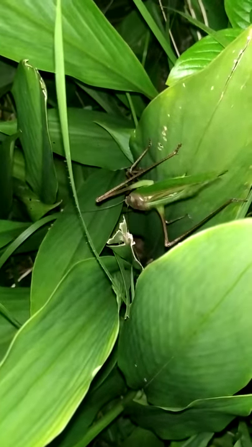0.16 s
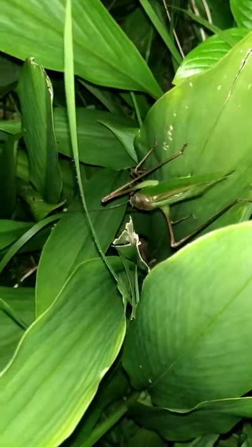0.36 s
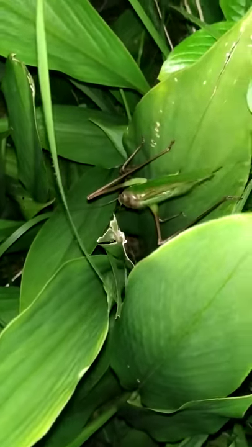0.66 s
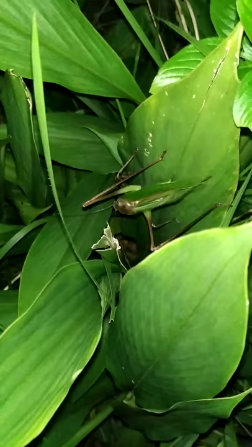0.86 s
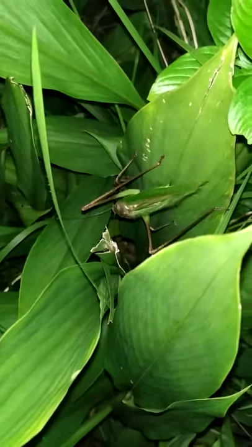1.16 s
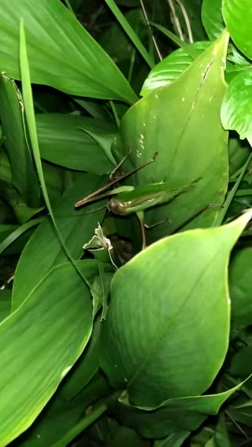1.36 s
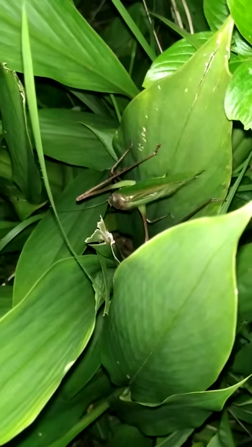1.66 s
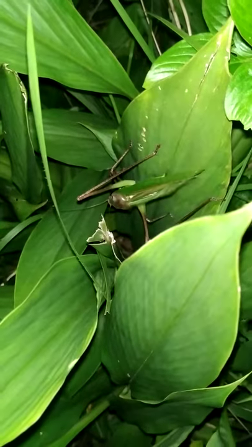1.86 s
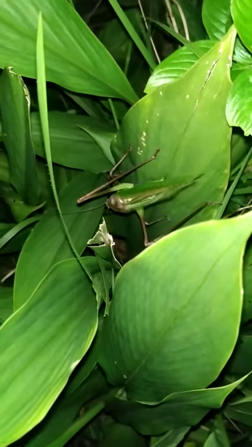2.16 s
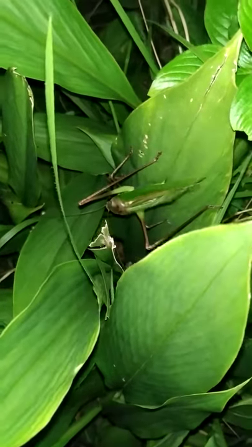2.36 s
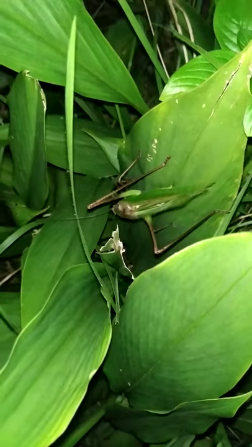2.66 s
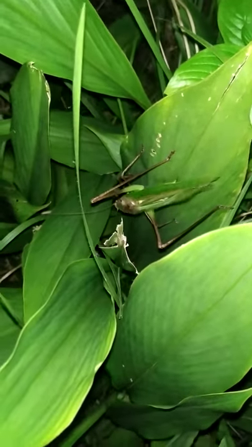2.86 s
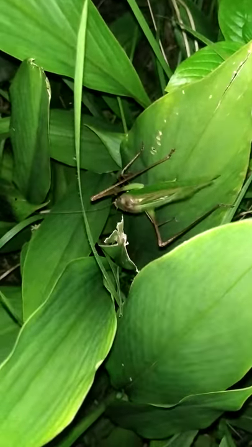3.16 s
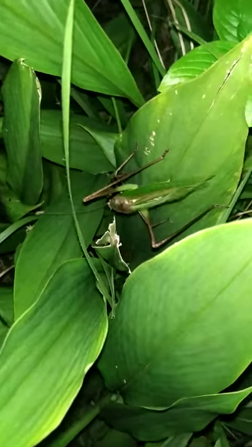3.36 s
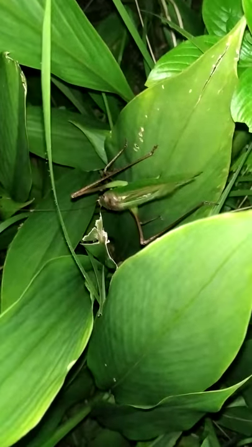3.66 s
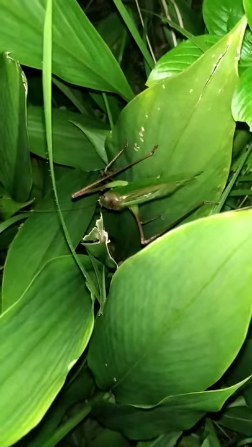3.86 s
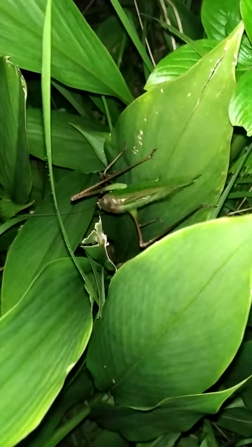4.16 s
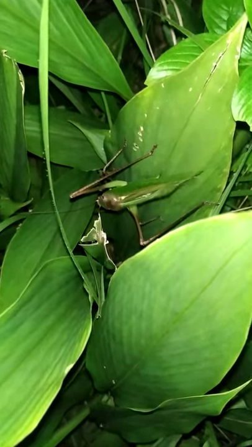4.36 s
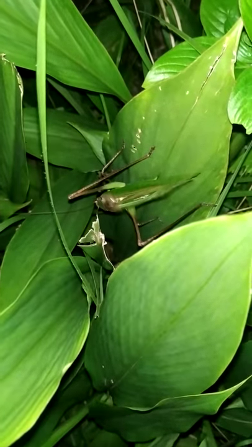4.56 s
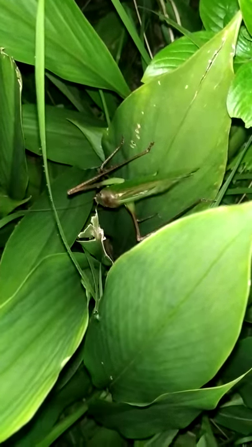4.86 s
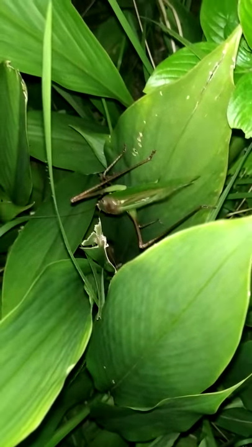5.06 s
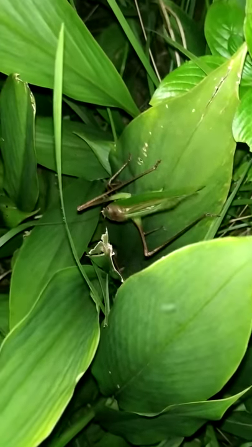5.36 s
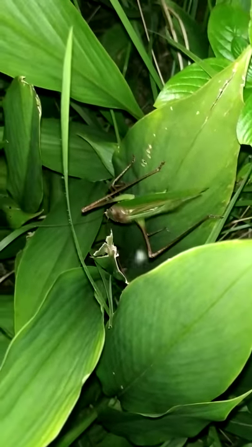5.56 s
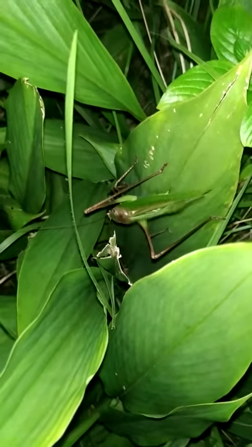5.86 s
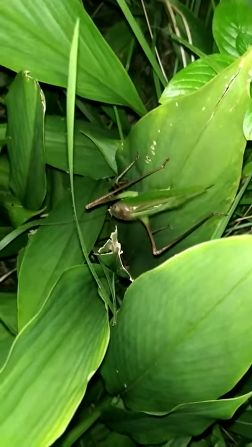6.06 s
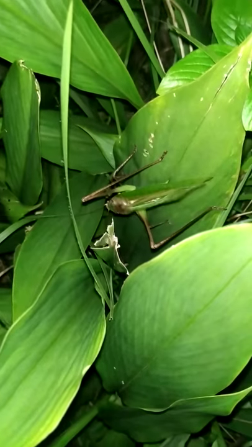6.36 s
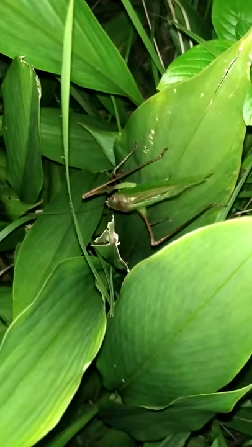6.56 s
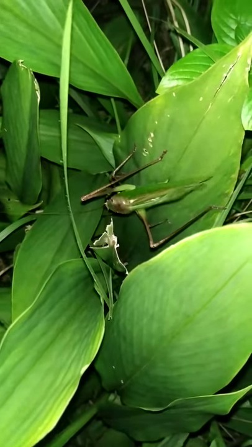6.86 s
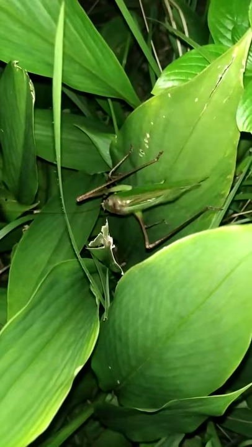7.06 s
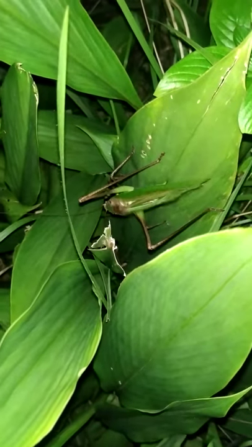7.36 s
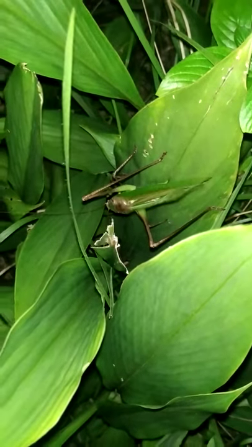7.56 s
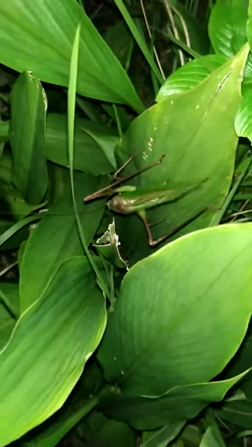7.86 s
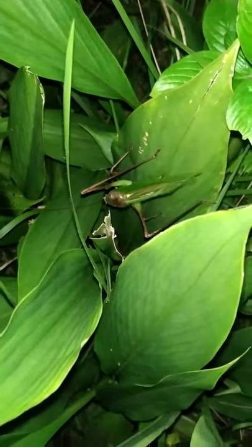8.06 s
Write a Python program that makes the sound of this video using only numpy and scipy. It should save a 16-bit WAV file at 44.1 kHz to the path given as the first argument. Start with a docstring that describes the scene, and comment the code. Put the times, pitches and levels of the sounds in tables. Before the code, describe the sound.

Continuous shrill insect buzzing at close range, rapid wing strokes fusing into a raspy, metallic trill over small low bumps and dull hiss.

```python
"""A katydid trills close by at night, as two microphones hear it.
About 28 times a second its wings shut and open, a scraper running over a file of teeth, slow then fast.
The tooth clicks ring the wing, and nearby leaves scatter and mirror the sound.
The loud strokes make the microphones crackle and jolt, over a faint steady hiss."""
import sys
import numpy as np
from scipy import signal
from scipy.fft import rfft, irfft, next_fast_len
from scipy.io import wavfile
from scipy.ndimage import uniform_filter1d, map_coordinates

SR = 44100
rng = np.random.default_rng(int(sys.argv[2]) if len(sys.argv) > 2 else 0)


def generate_wav(signal):
    """Clip the signal to [-1, 1] and save it as 16-bit WAV at the path in sys.argv[1]."""
    frames = np.transpose(np.atleast_2d(signal))
    scaled = np.clip(frames, -1, 1) * 32767
    pcm = np.round(scaled).astype(np.int16)
    wavfile.write(sys.argv[1], SR, pcm)


N = 361179  # samples, about 8.2 s

BEAT_HZ = 27.95  # wing beats per second, before the drift
BEAT_MS = 1e3 / BEAT_HZ
SIDE = np.array([[.5], [-.5]])  # shares a left-minus-right level between left and right
# edges of the three treble bands: edge_hz
TREBLE_EDGES_HZ = [8250, 11000, 13300, 22050]


def undb(db):
    """Turn decibels into an amplitude factor."""
    return 10 ** (np.asarray(db) / 20)


def unit(x):
    """Scale a sound to an average (rms) level of 1."""
    return x / np.sqrt(np.mean(x ** 2))


def wander(hz):
    """Smooth chance up to hz, spread 1."""
    lowpass = signal.butter(2, hz, fs=SR, output="sos")
    return unit(signal.sosfilt(lowpass, rng.standard_normal(N)))


def over_time(table):
    """Draw each column of a table as a curve over time; the first column is start_s."""
    start_s, *columns = np.transpose(table)
    return [np.interp(np.arange(N) / SR, start_s, column) for column in columns]


def band(spectrum, f, low_hz, high_hz, size):
    """Cut one band out of a spectrum and turn it back into sound."""
    return irfft(spectrum * ((f >= low_hz) & (f < high_hz)), size)[:, :N]


def beat():
    """Number of each wing beat and the time within it in ms, as the beat drifts early and late."""
    # drift of the wing beat: start_s, behind_even_beat_ms
    drift = [(0, -1.74), (0.18, -1.51), (0.39, -0.72), (0.57, -2.5), (0.68, -2.5), (0.82, -3), (0.93, -2.5),
             (1.25, -1.0), (1.43, -0.36), (1.57, -0.43), (1.72, -1.5), (1.86, -2), (1.97, -2.5),
             (2.04, -2.5), (2.11, -2), (2.18, -2.5), (2.5, -4), (2.68, -3.5), (2.93, -4.0), (3.29, -4),
             (3.61, -5.5), (3.93, -8), (4.11, -8.5), (4.53, -11.5), (4.71, -13), (4.85, -13), (5.0, -12.5),
             (5.14, -12), (5.32, -12), (5.43, -12.0), (5.53, -11.5), (5.64, -10.5), (5.68, -10.5),
             (5.86, -11.5), (6.21, -11.5), (6.32, -12), (6.5, -11.5), (6.57, -11.5), (6.72, -10),
             (6.82, -9), (6.9, -9.5), (6.97, -7.0), (7.08, -4.5), (7.34, 0.76), (7.44, 2), (7.81, 8),
             (7.92, 10.5), (8.19, 12.5)]
    behind_ms, = over_time(drift)
    turns = (np.arange(N) / SR - behind_ms / 1e3) * BEAT_HZ + .5
    return np.floor(turns).astype(int) + 2, (turns % 1 - .5) * BEAT_MS


def stroke():
    """One wing beat: each scrape swells and fades, and the scraper eases off before the next."""
    # the scrapes of one beat, in order: slow drag, quick flick, closing, opening
    # columns: middle_ms (from mid closing), length_ms, teeth struck start_hz, middle_hz, end_hz,
    # steepness of the turn to the ends (power), level_db, fall_to_ends_db, roughness (0-1),
    # crackle_db, lowest_partial_db
    scrapes = [(-16, 6.5, 2450, 2370, 2300, 1.499, -6, .5, .6, -14.5, -8.5),
               (-9, 2.2, 7800, 5100, 6500, 1.6, 4.9, 3, .2, -18, -3),
               (-1.06, 10.8, 2200, 2400, 2720, 1.15, -1, 5, .13, 1, -1),
               (9, 6.8, 9800, 4950, 7300, 2.4, 0.5, 2.5, 0.2, -6, -1)]
    ease_db, ease_rough, ease_crackle_db = -34, .55, -25
    # lighter pressure is rougher (share per dB) and crackles less (dB per dB)
    rough_per_db, crackle_per_db = 0.44, 3.5
    (middle, length, start_hz, middle_hz, end_hz, steep,
     db, fall_db, rough, crackle_db, low_db) = np.transpose(scrapes)[:, :, None]
    u = np.linspace(-1, 1, 11)  # from start to end of a scrape
    at = middle + u * length / 2
    fall = fall_db * u ** 2
    side_hz = np.where(u < 0, start_hz, end_hz)
    hz = middle_hz + (side_hz - middle_hz) * np.abs(u) ** steep
    scrape = [at, hz, db - fall, rough + rough_per_db * fall,
              crackle_db - crackle_per_db * fall, low_db + 0 * u]
    # one easing point halfway to the next scrape; after the last comes the next beat
    after = np.roll(at[:, 0], -1)
    after[-1] += BEAT_MS
    ease_hz = (hz[:, -1] + np.roll(hz[:, 0], -1)) / 2
    ease = [(at[:, -1] + after) / 2, ease_hz, ease_db, ease_rough, ease_crackle_db, 0]
    return [np.column_stack([s, e + np.zeros(len(s))]).ravel() for s, e in zip(scrape, ease)]


def teeth(number, ms):
    """Tooth clicks as a band-limited pulse train mixed with scratchy noise; also the microphone strain."""
    chance = rng.standard_normal((number.max() + 2, 5))
    # a strong beat tends to be followed by a weak one
    chance = (np.diff(chance, axis=0) / np.sqrt(2))[number].T
    at, *columns = stroke()
    ms = ms + 0.151 * chance[0]
    hz, db, rough, crackle_db, low_db = (np.interp(ms, at, c, period=BEAT_MS) for c in columns)
    rough = np.clip(rough * np.exp(0.355 * chance[2]), 0, 1)
    # the scraper catches and slips, so its speed and pressure waver
    hz = hz * (1 + .012 * chance[1] + .12 * rough * wander(903.0))
    phase = 2 * np.pi * np.cumsum(hz) / SR
    # teeth struck faster than the wing can settle blur into a near-sine
    sharp = np.interp(hz, [3000, 4500], [1, .35])
    clicks = undb(low_db + 0.95 * chance[4]) * np.cos(phase)
    for k in range(2, 9):
        below_top = np.clip((17000 - k * hz) / 500, 0, 1)  # fade partials out near 17 kHz
        clicks = clicks + np.cos(k * phase) * sharp ** (k - 1) * below_top
    highpass = signal.butter(1, 3500., "high", fs=SR, output="sos")
    scratch = signal.sosfilt(highpass, rng.standard_normal(N)) * (.8 + 1.6 * sharp)
    waver_db = 4.2 * np.tanh(wander(490.0)) * np.sqrt(rough)
    pressure = undb(db + 0.51 * chance[3] + waver_db)
    strain = undb(crackle_db + 1.14 * chance[3] + 0.81 * chance[4])
    # more roughness means less clicking and more scratching
    return pressure * (np.sqrt(1 - rough ** 2) * clicks + rough * scratch), strain


def wing(f):
    """The wing's resonances add in power, the left lead turns from one to the next; the lows are cut."""
    # resonances at each microphone: pitch_hz, width_hz (between the points 6 dB down),
    # left_db, right_db, left_lead_radians
    resonances = [(2315, 312, -13.5, -19.5, -1.34), (2423, 690, -14.5, -16.5, -2),
                  (3040, 290, -19, -24.5, -3), (3840, 450, -26.5, -24.5, 3.5), (4180, 240, -21, -25, -2),
                  (4590, 940, -14.5, -17, -1), (4551, 93, -11.5, -7.5, -0.3), (5163, 670, -26, -2.5, -1.2),
                  (5710, 520, -13.5, -6, -3), (5810, 210, -11, -13, 0.35), (6210, 174, -7, -3.5, -2),
                  (6334, 270, -6.5, -7.5, 1.5), (6754, 420, -3.5, -7.5, 0.76),
                  (7328, 326, -7.5, -8.5, -2.5), (8480, 430, -19.5, -14, 4), (8590, 470, -18.5, -13, 2.5),
                  (9300, 390, -9.5, -27.5, -3), (9940, 520, -15, -11.5, 3), (10560, 560, -7.5, -14.5, 5),
                  (11490, 620, -13, -12.5, -2.5), (12570, 610, -11.5, -18, 1.5),
                  (12820, 860, -18.5, -20, 2), (13940, 650, -7, -14, 1.5), (14760, 760, -13, -13, -3),
                  (16700, 450, -29, -2, 3), (15500, 490, -23, -10, 3.5)]
    power = 0
    for hz, width, left_db, right_db, _ in resonances:
        shape = 1 / (1 + (1.3 * (f - hz) / width) ** 2) ** 4
        power = power + undb([[left_db], [right_db]]) ** 2 * shape
    # steep low cut: hardly any buzz is heard below about 2.1 kHz
    power = power / (1 + (2100. / (f + 1)) ** 16)
    hz, *_, lead = np.transpose(resonances)
    turn = np.interp(f, hz, np.cos(lead)) + 1j * np.interp(f, hz, np.sin(lead))
    return np.sqrt(power) * np.array([turn / np.abs(turn), np.ones(len(f))])


def leaves(clicks, f, size, t60_s=0.1):
    """Scatter off trembling leaves: noise that follows the loudness of the clicks with a short tail."""
    # leaf scatter: pitch_hz, level_db, share common to both microphones (0-1)
    scatter_levels = [(2340, -5, 0), (3470, -1.5, 0.83), (5270, -7.5, 0), (7100, -8.5, 0.4),
                      (8484, -2.5, 1), (8410, 13, 0.88), (11200, 2, 0.63), (12600, 0, 0.9),
                      (15000, 0, 0.37)]
    decay = np.exp(-2 * np.log(1000) / (t60_s * SR))
    power = signal.lfilter([1], [1, -decay], clicks ** 2)
    left_right_common = unit(np.sqrt(power)) * rng.standard_normal((3, N))
    noise = rfft(left_right_common, size)
    hz, level_db, share = np.transpose(scatter_levels)
    share = np.clip(np.interp(f, hz, share), 0, 1)
    scatter = np.sqrt(1 - share) * noise[:2] + np.sqrt(share) * noise[2]
    return undb(np.interp(f, hz, level_db)) * scatter


def buzz(spectrum, f, size):
    """The sound below the treble, its upper part rising and falling against the lower one."""
    # level of the upper buzz against the lower one: start_s, level_db
    upper_levels = [(0, 1), (1.0, 1.6), (2.2, 1), (3.0, -0.5), (4.3, -1.4), (5.3, 0), (6.5, 0.2), (7.3, 0),
                    (8.19, -0.5)]
    upper_hz = 5950
    upper_db, = over_time(upper_levels)
    lower = band(spectrum, f, 0, upper_hz, size)
    upper = band(spectrum, f, upper_hz, TREBLE_EDGES_HZ[0], size)
    return unit(lower + upper * undb(upper_db))


def mirrored(x):
    """A near leaf echoes the treble; as the lag wanders, the peaks and dips slide."""
    # mean lag, one row for left and one for right: lag_ms
    mirror_ms = [
        [1.1],
        [0.85],
    ]
    level_db, wander_ms = -5, .04
    lag_ms = np.array(mirror_ms) + wander_ms * np.array([wander(.5), wander(.5)])
    echo = [map_coordinates(v, [np.arange(N) - lag], order=3, mode="mirror")
            for v, lag in zip(x, lag_ms * SR / 1e3)]
    return x + undb(level_db) * np.array(echo)


def treble(spectrum, f, size):
    """Three treble bands, each with its own changing level, plus their leaf echo."""
    # relative levels of the bands: start_s, low_band_db, middle_band_db, high_band_db
    treble_levels = [(0.06, -33, -32, -27), (0.62, -34, -31.5, -28), (1.0, -34, -30, -31),
                     (1.23, -32.5, -27.5, -35), (1.45, -33.5, -31.5, -35), (1.61, -33, -30, -31),
                     (2.53, -32.5, -33, -29), (3.07, -31, -29.5, -28), (3.74, -33, -31, -26),
                     (4.53, -34.5, -31, -26), (4.71, -32.5, -30.5, -23), (5.06, -33.5, -30.5, -24.5),
                     (5.2, -33, -33, -29.5), (5.96, -32, -31, -29.5), (6.14, -32.5, -30.5, -29),
                     (6.17, -33.5, -31.5, -28), (7.6, -34, -30.5, -27.5), (8.12, -32, -29.5, -26)]
    bands = 0
    for low, high, db in zip(TREBLE_EDGES_HZ, TREBLE_EDGES_HZ[1:], over_time(treble_levels)):
        bands = bands + undb(db) * unit(band(spectrum, f, low, high, size))
    return mirrored(bands)


def katydid(clicks):
    """The clicks ring the wing and scatter off leaves; the treble sways apart from the rest."""
    # slow changes as the microphones are held: start_s, level_db (relative, buzz only),
    # left_minus_right_db (buzz), left_minus_right_db (treble)
    sway = [(0.0, -17.5, -1.5, -1), (1.71, -17, -0.5, -1.5), (3.05, -18, -0.9, -1.5), (4.8, -17.5, -1, -3),
            (5.39, -18, -0.5, 0), (6.44, -18.5, -1, 0), (8.19, -18, -1, -2)]
    size = next_fast_len(N + 8192)  # room for the ringing
    f = np.arange(size // 2 + 1) * SR / size
    # the beating wing faces each microphone a little differently from moment to moment
    facing = undb(1.02 * np.array([wander(250.0), wander(355.0)]))
    spectrum = rfft(unit(clicks) * facing, size) + leaves(clicks, f, size)
    spectrum = spectrum * wing(f)
    db, pan_db, treble_pan_db = over_time(sway)
    body = undb(2.0 + db + SIDE * pan_db) * buzz(spectrum, f, size)
    return body + undb(4.0 + SIDE * treble_pan_db) * treble(spectrum, f, size)


def crackle(strain):
    """Bursts of uneven clicks in the microphones, strongest under the loud strokes."""
    size = np.minimum(rng.exponential(size=(2, N)), 5.2)
    clicks = rng.standard_normal((2, N)) * undb(4.9 * size) * strain
    lowpass = signal.butter(2, 2600., fs=SR, output="sos")
    return unit(signal.sosfilt(lowpass, clicks)) * undb([[-54.], [-44.]])


def jolts(strain):
    """Sudden jumps of a microphone's rest point, which then creeps back."""
    # the strongest jolts of the right microphone: start_s, jump (full scale)
    strong_jolts = [(0.044, -0.02), (0.211, -0.021), (0.36, -0.027), (0.475, -0.023), (0.687, -0.016),
                    (0.782, -0.019), (0.824, -0.019), (0.899, -0.023), (1.082, -0.026), (1.152, -0.017),
                    (1.223, -0.013), (1.395, -0.023), (1.433, -0.02), (1.49, -0.016), (1.576, 0.031),
                    (1.712, -0.028), (1.764, -0.02), (1.816, -0.016), (1.943, -0.024), (2.869, -0.03),
                    (3.431, -0.021), (3.689, -0.017), (3.82, -0.07), (3.855, 0.058), (3.962, 0.038),
                    (4.029, -0.028), (4.177, -0.018), (4.744, -0.043), (4.816, 0.017), (5.113, -0.02),
                    (5.32, -0.013), (5.507, -0.027), (5.566, -0.022), (5.76, -0.026), (5.857, -0.018),
                    (6.045, -0.019), (6.39, -0.031), (6.459, -0.044), (6.504, 0.029), (6.751, 0.083),
                    (6.781, -0.044), (6.815, -0.023), (6.969, -0.02), (7.272, -0.02), (7.491, -0.033),
                    (7.598, -0.021), (7.875, 0.039), (7.944, -0.023), (8.038, -0.025)]
    happens = rng.random((2, N)) < 60. / SR  # about 60 small jumps a second
    jumps = rng.standard_normal((2, N)) * happens * strain * undb([[-62.], [-49.]])
    start_s, jump = np.transpose(strong_jolts)
    jumps[1, (start_s * SR).astype(int)] += jump
    softened = uniform_filter1d(jumps, size=24, axis=1)
    creep_s = 0.054
    return signal.lfilter([1], [1, -np.exp(-1 / (creep_s * SR))], softened)


def hiss():
    """Steady dull noise, separate in each microphone."""
    lowpass = signal.butter(2, 2600., fs=SR, output="sos")
    return unit(signal.sosfilt(lowpass, rng.standard_normal((2, N)))) * undb([[-57.], [-52.]])


def scene():
    """The trill, with the microphones' own crackle, jolts and hiss."""
    clicks, strain = teeth(*beat())
    return katydid(clicks) + crackle(strain) + jolts(strain) + hiss()


def record(dry):
    """The rest point shifts with the loudness, the loudest peaks round off, the top is cut."""
    # shift per sound power, one row for left and one for right: share
    lopsided = [
        [-0.059],
        [-0.05],
    ]
    lopsided_hz, ceiling, top_hz = 120, .72, 15760  # ceiling in full scale
    power = dry ** 2 - np.mean(dry ** 2, axis=1, keepdims=True)
    slow_power = signal.sosfilt(signal.butter(3, lopsided_hz, fs=SR, output="sos"), power)
    rounded = dry / (1 + (dry / ceiling) ** 4) ** (1 / 4)
    wet = rounded + np.array(lopsided) * slow_power
    return signal.sosfilt(signal.ellip(16, .3, 100, top_hz, fs=SR, output="sos"), wet)


dry = scene()
out = record(dry)
generate_wav(out)
```